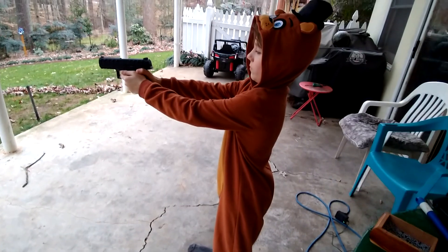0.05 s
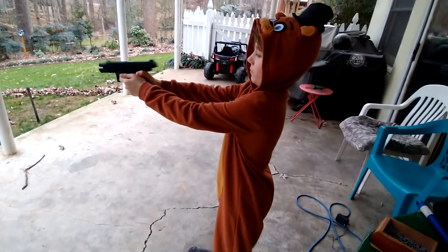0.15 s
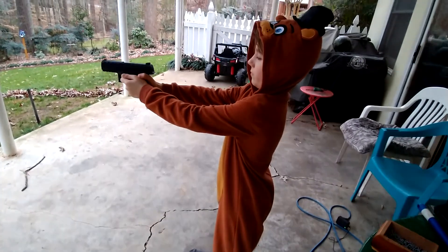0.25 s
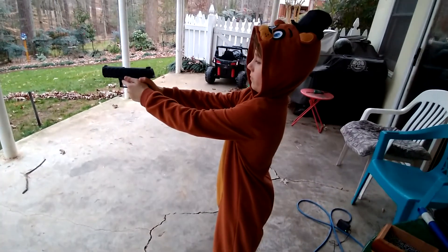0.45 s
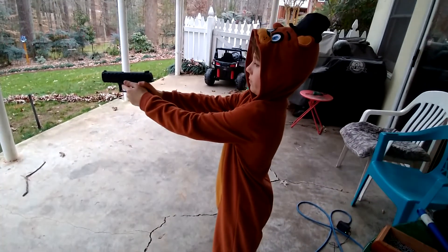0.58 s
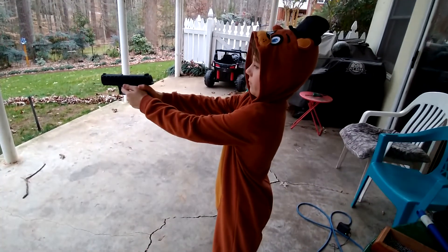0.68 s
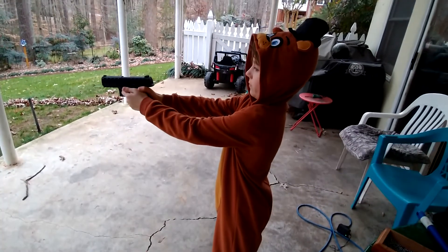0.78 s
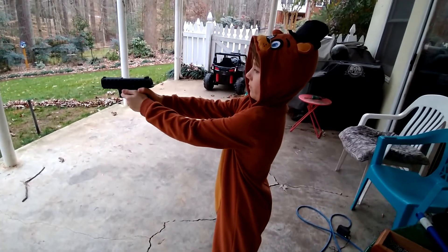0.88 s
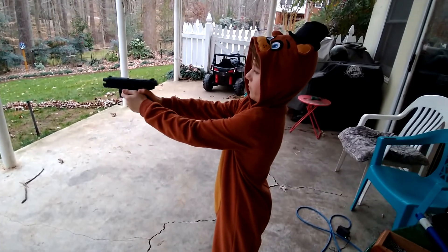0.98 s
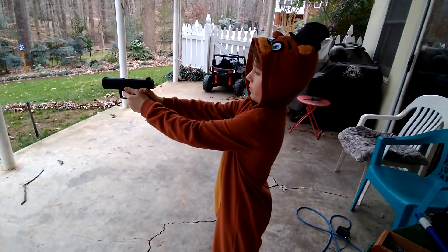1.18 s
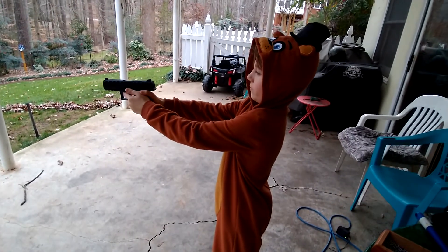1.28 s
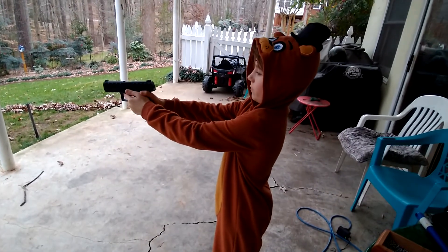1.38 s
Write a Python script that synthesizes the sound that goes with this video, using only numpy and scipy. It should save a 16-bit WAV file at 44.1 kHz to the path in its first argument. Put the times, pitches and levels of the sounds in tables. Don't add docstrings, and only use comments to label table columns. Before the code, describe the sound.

A small gas pistol fires twice close by, sharp cracks slapping and echoing outdoors

```python
import sys
import numpy as np
from scipy import signal
from scipy.fft import rfft, irfft
from scipy.io import wavfile
from scipy.ndimage import uniform_filter1d

SR = 44100
rng = np.random.default_rng(int(sys.argv[2]) if len(sys.argv) > 2 else 0)


def ratio(d):
    e = np.asarray(d, float) / 20
    return 10 ** e


def unload_wav(signal):
    wavfile.write(
        sys.argv[1],
        SR,
        np.round(np.clip(np.atleast_2d(signal).T, -1, 1) * 32767).astype(np.int16),
    )


N = 63945
BETWEEN_SHOTS_S = 0.73


def read(points, hz):
    f, value = np.transpose(points)
    return np.interp(np.log(hz + 1), np.log(f + 1), value)


def colour(x, spectrum):
    log_gain = np.log(ratio(read(spectrum, abs(np.fft.fftfreq(4096, 1 / SR)))))
    taps = np.fft.ifft(np.exp(np.conj(signal.hilbert(log_gain)))).real[:2048]
    return signal.oaconvolve(x, taps[None] / np.linalg.norm(taps), axes=1)[:, :N]


def since(s):
    t = np.arange(N) / SR - s
    return np.maximum(t, 0), t >= 0


def sides(pan_db):
    return ratio([[pan_db / 2], [-pan_db / 2]])


def bursts(rows, spectrum):
    power = 0
    for s, db, fade_ms, pan_db in rows:
        t, on = since(s)
        shape = on * np.minimum(t / 0.00097, 1) * np.exp(-t * 1000 / fade_ms)
        power = power + (ratio(db) * sides(pan_db) * shape) ** 2
    return colour(np.sqrt(power) * rng.choice([-1., 1.], (2, N)), spectrum)


# (time [s], level [dB], fade [ms], left-right [dB])
CRACKS = [(0.2181, -16.5, 2.5, 1), (0.2225, -4.5, 2.2, 6), (0.2236, 6, 1.03, -2), (0.2285, -0.5, 0.86, -16),
          (0.2299, -8.5, 6.5, 12.5), (.2322, -21.5, 1, 2), (0.2344, -8.5, 3.4, -10.5),
          (0.2384, -12.5, 2.2, 3), (0.242, -7.5, 2.8, 0.5), (0.246, -9, 1.6, 1.5),
          (0.2497, -16, 2.88, -2.5), (.259, -12, 1.9, 2.5), (0.2707, -19.5, 2.4, 2), (1.0195, -31, 3, 14),
          (1.0211, -13, 5.6, 2), (1.0258, -1, 2.18, -14), (1.0306, -4, 3.1, -3.5), (1.0338, 8, 0.67, 3),
          (1.0379, -6.5, 6.4, 6.5), (1.0401, -6, 1.86, 13), (1.047, -7, 1.8, 7), (1.066, -16, 3, 5)]
# (frequency [Hz], level [dB per Hz])
FIRST_GAS = [(250, -14), (900, -11.5), (1900, -7), (3100, -11.5), (4100, -6.5), (5700, -2), (8500, -6.5),
             (15300, -12.5), (16500, -37.5)]
# (frequency [Hz], level [dB per Hz])
SECOND_GAS = [(250, -15), (800, -13.5), (1650, -6), (2900, -11), (4150, -1), (5500, -3.5), (8000, -5),
              (15300, -12.5), (16500, -41)]


def gas():
    first = [row for row in CRACKS if row[0] < BETWEEN_SHOTS_S]
    second = [row for row in CRACKS if row[0] >= BETWEEN_SHOTS_S]
    return bursts(first, FIRST_GAS) + bursts(second, SECOND_GAS)


# (time [s], left height, right height, recovery [ms])
STEPS = [
    (0.2239, -0.3, -0.5, 2.5),
    (0.2303, -0.2, -0.15, 1.5),
    (1.0267, -0.8, -0.12, 5),
    (1.0298, 0, -.2, 2),
    (1.0315, 0.1, 0.5, 1.5),
]


def steps():
    out = np.zeros((2, N))
    for s, left, right, back_ms in STEPS:
        t, on = since(s)
        push = on * (1 - np.exp(-t / 0.000059))
        out += np.array([[left], [right]]) * push * np.exp(-t * 1000 / back_ms)
    return out


# (time [s], ring [dB], clank [dB], left-right [dB])
BLOWS = [
    (0.279, -20.5, -11, -0.5),
    (0.2947, -36, -18.5, -3),
    (0.3242, -30.5, -37, -9.5),
    (1.0832, -21.5, -11, -2),
    (1.088, -20.5, -10.5, -2.5),
    (1.1053, -33, -24.5, -17),
    (1.183, -41, -33, 9),
]
# (frequency [Hz], level [dB per Hz])
CLANK = [(600, -29), (1520, 8), (2100, -1.5), (3000, 1.5), (5930, 5.5), (8300, -2), (13000, -25),
         (16500, -47.5)]
# (frequency [Hz], level in first shot [dB], level in second shot [dB], t60 [s])
STEEL = [(1542, -10, -6.5, 0.093), (2650, -4.5, -12, 0.042), (3324, -17.5, -9, 0.12), (4190, -7.5, -6, 0.1),
         (5445, -8, -5.5, 0.2), (5930, 0, -2.5, 0.18), (7016, -4.5, -2.5, 0.18), (7450, -13, -8.5, 0.31),
         (8300, -2.5, -4.5, 0.15), (9150, -11, -20.5, 0.25), (9880, -9.5, -11.5, 0.18),
         (11090, -11, -9.5, 0.11), (1258, -9.5, -10.5, 0.035), (14400, -11.5, -14, 0.11)]
TWIN_SPLIT, TWIN_DB = 0.007, -9
WAVER, WAVER_S, LOOSEN_S = 1.3, 0.004, 0.015
STRIKE_DB, STRIKE_S = 5, 0.008


def steel():
    out = bursts([(s, clank_db, 3, pan_db) for s, _, clank_db, pan_db in BLOWS], CLANK)
    size = round(WAVER_S * SR)
    for hz, first_db, second_db, t60 in STEEL:
        a, b = uniform_filter1d(uniform_filter1d(rng.standard_normal((2, 2, N)), size), size)
        waver = WAVER * (a + 1j * b) / a.std()
        ring = 0
        for s, ring_db, _, pan_db in BLOWS:
            t, on = since(s)
            phase = np.exp(2j * np.pi * rng.random((2, 1)))
            twins = phase * (1 + ratio(TWIN_DB) * np.exp(-2j * np.pi * hz * TWIN_SPLIT * t))
            mode_db = first_db if s < BETWEEN_SHOTS_S else second_db
            level = ratio(ring_db + mode_db + STRIKE_DB * np.exp(-t / STRIKE_S) - 60 * t / t60)
            loose = 1 + np.minimum(t / LOOSEN_S, 1) * waver
            ring = ring + on * level * sides(pan_db) * twins * loose
        out += (ring * np.exp(2j * np.pi * hz * since(0)[0])).real
    return out


# (time [s], level [dB], frequency [Hz], t60 [s])
BOOMS = [
    (.2288, -24, 340, .1),
    (1.0305, -25, 320, .07),
    (1.183, -41, 310, .09),
    (.385, -46, 320, .06),
    (.31, -52, 222, 1.4),
]


def booms():
    out = 0
    for s, db, hz, t60 in BOOMS:
        t, on = since(s)
        out = out + ratio(db - 60 * t / t60) * np.sin(2 * np.pi * hz * t) * sides(-2)
    return out


# (time [s], level [dB], fade [ms], left-right [dB])
CLICKS = [(.011, -57, 2.6, -7), (.0174, -58, 3, -1), (.0235, -50, 1.6, -1), (.032, -57, 8.1, -19),
          (.0383, -41.5, 6, 6), (.0425, -58, 2, 10), (.048, -54, 3, 13), (.0595, -52, 3.2, -8),
          (.1285, -59, 4.4, 7), (.136, -63, 5.3, -1.5), (.182, -64, 6.2, 2), (.1735, -60, 1.2, -3.5),
          (.716, -57.5, 2, 11), (.806, -61, 2, -9), (.85, -67, 23, 0), (.875, -73.5, 33, 0.5),
          (.9, -64.5, 20, 1), (.911, -64, 1.9, -6.5), (.9235, -51, 5.5, 2.5), (.9283, -47.5, 2.1, -9),
          (.9393, -39, 3.2, -0.5), (.9445, -47, 14, 2.5), (.955, -51.5, 2.6, -2), (.979, -50, 7.6, 1)]
# (frequency [Hz], level [dB per Hz])
CLICK = [(410, -62), (700, -15), (1810, -11.5), (3470, -8), (7170, 1), (13900, -12.5), (15900, -21.5),
         (16500, -34)]
# (time [s], level [dB], frequency [Hz])
KNOCKS = [(0.0392, -47.5, 1760), (0.049, -48.5, 4100), (0.129, -57, 1340), (.1355, -63.5, 2700),
          (0.142, -62, 1450), (.1735, -56.5, 2650), (.174, -58.5, 4130), (.716, -61.5, 4370),
          (0.9396, -56.5, 1073), (0.9382, -54, 1670), (0.981, -53.5, 1200)]
KNOCK_T60_S = 0.016


def clicks():
    out = bursts(CLICKS, CLICK)
    for s, db, hz in KNOCKS:
        t, on = since(s)
        level = np.minimum(t / 0.00049, 1) * ratio(db - 60 * t / KNOCK_T60_S)
        out += level * np.sin(2 * np.pi * hz * t) * sides(3)
    return out


# (time [s], level [dB], fade [ms], left-right [dB])
RETURNS = [
    (.5048, -29, 1.8, -5),
    (.509, -39.5, 5.7, 7),
    (.528, -47, 7.1, 2),
    (1.3044, -26, 1.41, 2),
    (1.309, -38.5, 15.8, 2),
    (1.322, -58, 24, 2),
]
# (frequency [Hz], level [dB per Hz])
RETURN = [(2500, -22), (4500, -11), (6500, 0.5), (11000, -4.5), (14700, -12), (16500, -32)]


def returns():
    return bursts(RETURNS, RETURN)


# (time [s] of first shot, time [s] of second shot)
RUMBLE_S = (.226, 1.125)
# (level [dB] of first shot, level [dB] of second shot)
RUMBLE_DB = (-47.5, -45.5)
# (frequency [Hz], level [dB per Hz])
RUMBLE = [(30, -6), (60, -4.5), (110, 0.5), (220, -12.5), (600, -16), (1500, -41)]
RUMBLE_T60_S = 1.7


def rumble():
    roll = 0
    for s, db in zip(RUMBLE_S, RUMBLE_DB):
        t, on = since(s)
        roll = roll + on * ratio(db - 60 * t / RUMBLE_T60_S)
    return colour(roll * rng.standard_normal((1, N)), RUMBLE)


# (time [s], frequency [Hz], level [dB])
HUM = [(0, 144.8, -56), (.08, 139.2, -78), (.14, 141.5, -84), (0.399, 141.8, -57.5), (0.521, 141.7, -59),
       (.58, 135.1, -69), (0.639, 127.8, -67.5), (.72, 133.1, -62), (.79, 140.4, -59.5), (.97, 136.5, -61),
       (1.099, 140.4, -63.5), (1.19, 145.8, -51.5), (1.3, 131.4, -49.5), (1.37, 138.3, -55.5),
       (1.45, 135.3, -48.5)]


def hum():
    s, hz, db = np.transpose(HUM)
    now = np.arange(N) / SR
    phase = 2 * np.pi * np.cumsum(np.interp(now, s, hz)) / SR
    return np.sqrt(2) * ratio(np.interp(now, s, db)) * np.sin(phase)


# (frequency [Hz], level [dB per Hz])
AIR = [(25, -23.5), (140, -5.5), (260, -12), (510, -23), (2000, -27.5), (7500, -28), (10500, -48),
       (16500, -67)]
# (frequency [Hz], left-right correlation)
SAME = [(60, 0.97), (130, 0.41), (290, 0.96), (640, 1), (1400, 0), (15000, 0.18)]
AIR_DB = -64


def air():
    frames, hz = N // 256 + 5, np.fft.rfftfreq(1024, 1 / SR)
    a, b, c, d, patches = rng.standard_normal((frames, 513, 5)).T
    patches = uniform_filter1d(uniform_filter1d(patches, 10, 0), 10, 1)
    same = np.clip(read(SAME, hz), -1, 1)[:, None]
    left = a + 1j * b
    right = same * left + np.sqrt(1 - same ** 2) * (c + 1j * d)
    level = ratio(read(AIR, hz)[:, None] + 0.5 * patches / patches.std())
    x = signal.istft(np.array([left, right]) * level, nperseg=1024, noverlap=768)[1][:, :N]
    return ratio(AIR_DB) * sides(2.1) * x / x.std()


def tail(decays, delay_s):
    taps = np.zeros((2, SR))
    at = np.arange(0, SR - 16, 16) + rng.integers(0, 16, (2, (SR - 1) // 16))
    np.put_along_axis(taps, at, rng.choice([-1., 1.], at.shape), 1)
    hz, t, z = signal.stft(taps, SR, nperseg=256)
    late = signal.istft(z * ratio(-60 * t / read(decays, hz)[:, None]), SR, nperseg=256)[1]
    return np.pad(late / np.linalg.norm(late[0]), ((0, 0), (round(delay_s * SR), 0)))


# (frequency [Hz], t60 [s])
YARD = [(100, 1.8), (500, 1.3), (2000, 1.05), (6000, 0.68), (9000, 0.42), (12000, 0.25), (15000, .2)]
YARD_DB, YARD_DELAY_S = -22.5, 0.06


def space(x, wet_db, decays):
    answer = signal.fftconvolve(x, tail(decays, 0.004), axes=1)[:, :N]
    answer += ratio(YARD_DB) * signal.fftconvolve(x, tail(YARD, YARD_DELAY_S), axes=1)[:, :N]
    return x + ratio(wet_db) * answer


# (frequency [Hz], t60 [s])
PATIO = [(100, 0.07), (300, 0.36), (900, 0.27), (2000, 0.35), (5500, 0.31), (10000, 0.36), (12500, 0.27),
         (15000, 0.26)]
# (frequency [Hz], t60 [s])
NEAR = [(500, 0.23), (3000, 0.061), (8000, 0.13), (15000, 0.39)]


def scene():
    shots = space(gas(), -1.5, PATIO) + steps() + space(steel(), -4, PATIO) + booms()
    details = space(clicks(), -2, NEAR) + space(returns(), -29, NEAR)
    return shots + details + rumble() + hum() + air()


# (crest [s], rise [s], t60 [s], height)
FLUTTERS = [
    (1.047, 0.021, 0.27, -0.007),
    (1.2166, 0.05, 1.2, .026),
]
FLUTTER_HZ, LEAN, OTHER_PORT = 101, 0.58, -0.36


def flutter():
    out = 0
    for s, rise_s, t60, height in FLUTTERS:
        t = np.arange(N) / SR - s
        swell = np.clip(1 + t / rise_s, 0, 1) ** 0.5 * ratio(-60 * np.maximum(t, 0) / t60)
        out = out + height * swell * (LEAN + np.cos(2 * np.pi * FLUTTER_HZ * t))
    return out * np.array([[1], [OTHER_PORT]])


# (time [s], frequency [Hz])
TOP = [(0, 15900), (.285, 15900), (.295, 15500), (.355, 15400), (.4, 14800), (.498, 14900), (.502, 15900),
       (.52, 15400), (.9, 15400), (.93, 15900), (1.092, 15900), (1.1, 15600), (1.295, 14900), (1.3, 15900),
       (1.325, 15800), (1.335, 15300), (1.45, 15300)]


def narrowed(x):
    hz, t, z = signal.stft(x, SR, nperseg=512, noverlap=384)
    below = hz[:, None] < np.interp(t, *np.transpose(TOP))
    return signal.istft(z * below, SR, nperseg=512, noverlap=384)[1][:, :N]


def top_cut(x):
    return signal.sosfilt(signal.butter(12, 17080, fs=SR, output="sos"), x)


LOW_CUT_HZ, EDGE_HZ = 68, 15900
KNEE_DB, SQUEEZE, RECOVER_DB_S = -21, 0.26, 142.5
CEILING = 1.2


def record(dry):
    hz = np.fft.rfftfreq(2 * N, 1 / SR)
    x = irfft(rfft(dry, 2 * N) / np.sqrt(1 + (LOW_CUT_HZ / (hz + 1)) ** 6))[:, :N]
    power_db = 10 * np.log10(abs(uniform_filter1d((x ** 2).mean(0), 200)) + 1e-12)
    fall = np.arange(N) * RECOVER_DB_S / SR
    held_db = np.maximum.accumulate(power_db + fall) - fall
    over_db = np.maximum(held_db - KNEE_DB, 0)
    x = x / ratio(SQUEEZE * uniform_filter1d(over_db, 100))
    x = CEILING * np.tanh(x / CEILING) + flutter()
    edge = signal.firwin(255, EDGE_HZ, window=("kaiser", 6), fs=SR)
    x = signal.oaconvolve(x, edge[None], "same")
    return top_cut(narrowed(x))


dry = scene()
out = record(dry)
unload_wav(out)
```